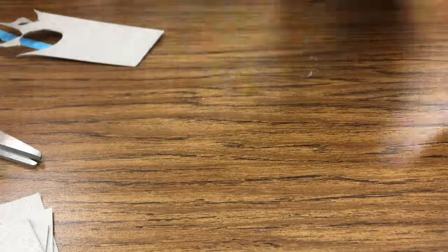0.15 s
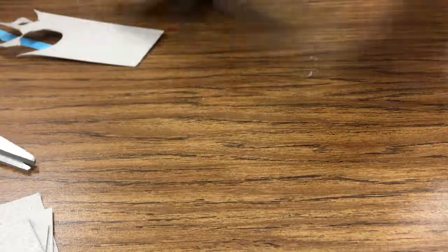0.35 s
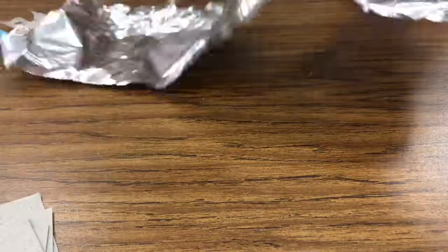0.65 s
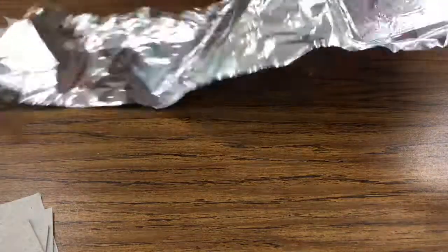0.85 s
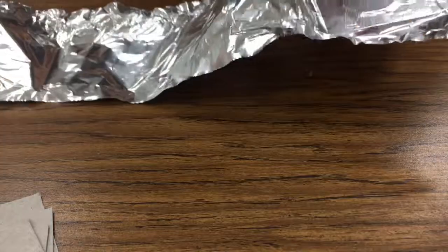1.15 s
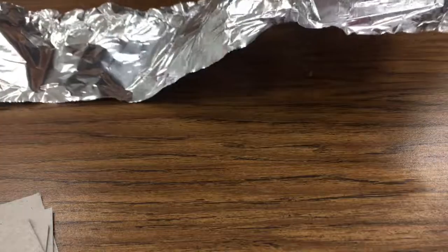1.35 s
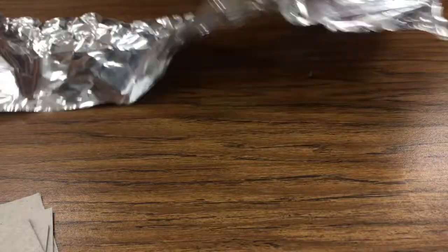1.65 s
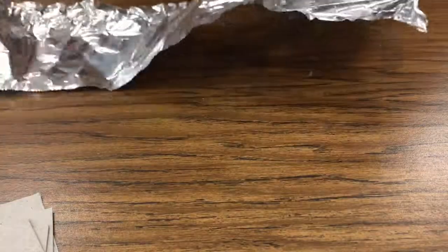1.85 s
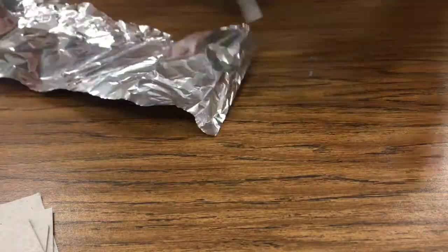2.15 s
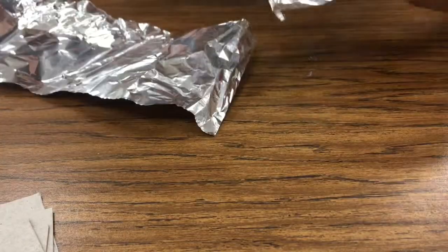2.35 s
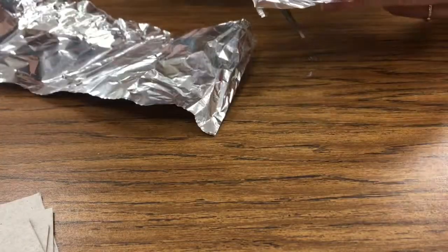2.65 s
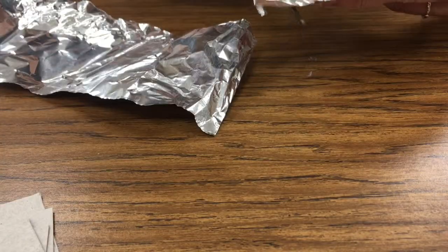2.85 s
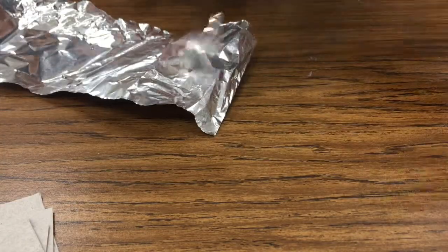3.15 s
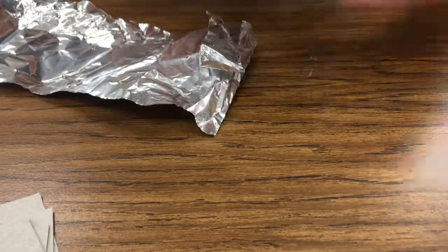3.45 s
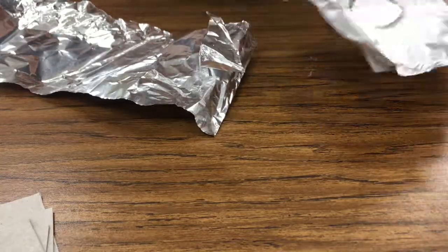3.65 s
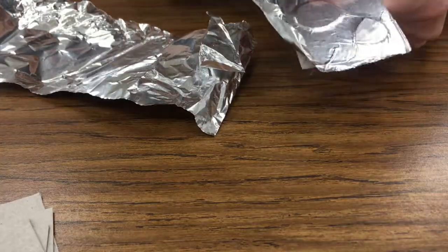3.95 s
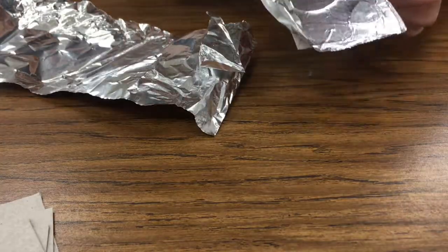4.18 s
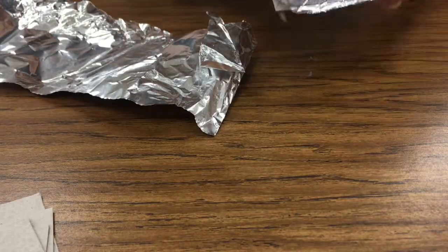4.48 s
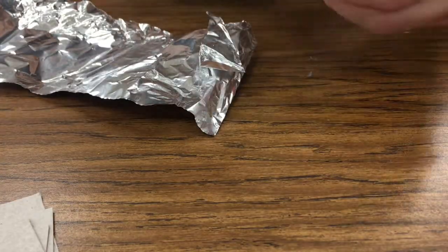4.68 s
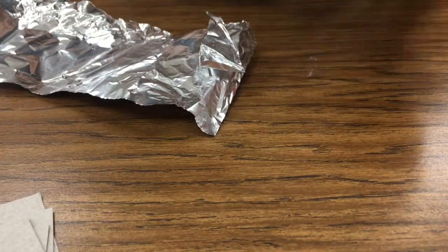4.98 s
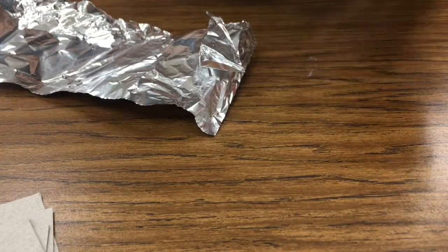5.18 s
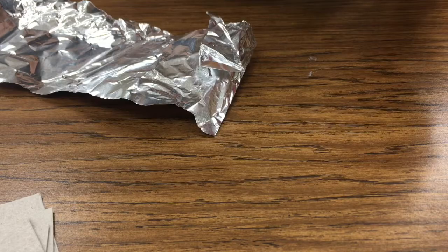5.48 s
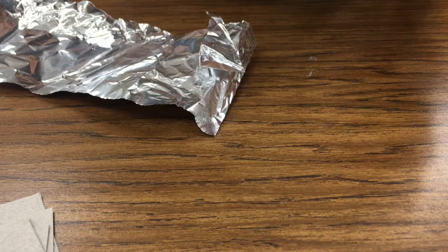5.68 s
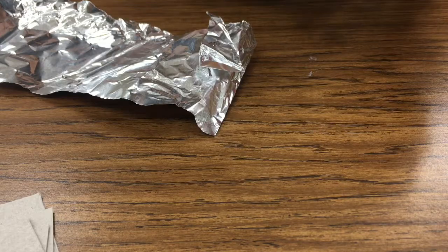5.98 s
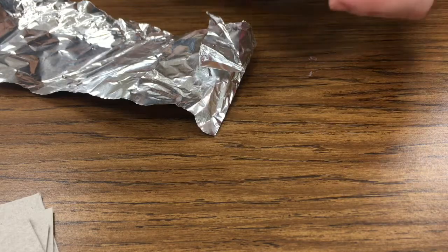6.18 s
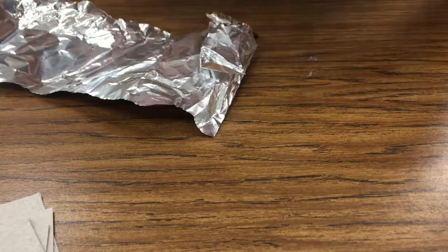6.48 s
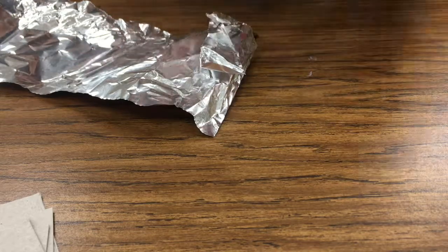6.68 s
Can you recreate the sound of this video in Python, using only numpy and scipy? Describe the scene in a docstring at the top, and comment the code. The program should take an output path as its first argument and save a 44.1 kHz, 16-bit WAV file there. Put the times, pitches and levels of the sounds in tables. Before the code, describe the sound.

A close, detailed view of foil handling in a quiet room with low, slowly beating fan hum, soft air rush and a thin hiss that dips briefly now and then. From 0 to 0.6 s, foil rustles densely and snaps brightly; a hard wooden double knock lands at about 0.25 s and a lighter one at 0.45 s. Strong crackles cluster at 0.75-0.95 s, the loose sheet ringing as a short metallic wash. After a calmer gap, crinkles resume at 1.5 s and run to about 2.4 s as it is laid down. Crisp snaps gather near 3 s, followed by faint squeaks and dull cardboard scuffs to 3.9 s. Dry, sharp ticks cluster at 4.05-4.3 s and around 5.05 s, with sparse light rubbing between. A bright snap at 5.98 s leads to small rustles and a faint squeak near 6.3 s, then near stillness with a few tiny ticks.

```python
"""A loose sheet of aluminium foil is lifted, with knocks on the wooden table at the start, and rings on as it moves.
It is laid on the table; then a small piece is pressed round cardboard and ticks drily, with squeaks and scuffs.
Snaps are bursts of tiny slips through a facet resonance; rustle is ticking noise that also lights up the sheet.
Knocks are noise cracks plus decaying table modes. Throughout, ventilation hums: steady sines in a low rush of
shaped noise. A thin hiss of brighter noise lies over everything and dips briefly now and then."""
import sys
import numpy as np
from scipy import signal
from scipy.fft import rfft, irfft, next_fast_len
from scipy.io import wavfile

SR = 44100
rng = np.random.default_rng(int(sys.argv[2]) if len(sys.argv) > 2 else 0)


def master(y):
    """Save y as 16-bit WAV."""
    cut = np.clip(np.atleast_2d(y).T, -1, 1)
    pcm = np.round(cut * 32767)  # scale
    wavfile.write(sys.argv[1], SR, pcm.astype(np.int16))


N = 300760

# The loudest creases buckling; snaps() trims the levels and scales the decay:
# start_s, level_db, decay_t60_s, facet_pitch_hz, body_db (low part against the bright part)
CREASES = [(.01, -36, .089, 13300, 1), (0.022, -34.5, 0.069, 12400, 3), (.0747, -27, 0.041, 8600, -6.5),
           (0.0894, -28, 0.13, 13100, -4.5), (0.147, -25.5, 0.044, 14100, -18),
           (.15, -23, 0.058, 11400, -8), (0.374, -29.5, 0.14, 13000, -27), (0.5294, -31, 0.066, 12100, -13),
           (.7253, -34.5, 0.075, 13800, -21), (0.7782, -32.5, 0.05, 8300, -13),
           (0.8323, -25, 0.049, 6400, -14.5), (.849, -26.5, 0.036, 8050, -31),
           (0.8622, -24, .07, 8360, -16.5), (.9213, -33.5, 0.032, 4650, -9),
           (0.9347, -25, 0.033, 6400, -29), (1.4966, -24.5, 0.015, 8460, -17.5),
           (1.5234, -32.5, 0.021, 8650, -15), (1.565, -37.5, 0.04, 8400, -3.5),
           (1.595, -30, .032, 10600, -28), (1.6905, -36, 0.18, 12400, -12.5),
           (1.8158, -38, .038, 10600, -11), (1.8243, -30.5, 0.046, 12400, -20),
           (1.8475, -33.5, .049, 13400, -13.5), (1.9118, -35, 0.091, 8700, -15.5),
           (1.9854, -32.5, 0.032, 8900, -18), (1.9936, -31.5, .026, 6700, -6.5),
           (2.0227, -27.5, .025, 9470, -18), (2.057, -34, 0.045, 11300, -23),
           (2.223, -38.5, 0.04, 6320, -28), (2.2629, -36, 0.012, 5440, -2),
           (2.2681, -28.5, 0.03, 14600, -15), (2.2925, -35, 0.043, 14900, -29),
           (2.3423, -30.5, 0.016, 13100, -15), (2.3696, -33, 0.021, 13600, -36),
           (2.492, -36.5, 0.01, 11100, -10.5), (2.619, -43, .041, 13200, -16),
           (2.6566, -34.5, 0.053, 11600, -21), (2.7166, -41.5, 0.05, 11700, -19),
           (2.8188, -43.5, .038, 9200, -15), (2.836, -47, 0.022, 10000, -23),
           (2.9389, -30.5, 0.022, 12500, -13), (2.9544, -31.5, .024, 8100, -15),
           (2.981, -32, 0.02, 13500, -19), (2.9952, -33, .027, 8850, -15), (3.0187, -25, 0.013, 13000, -16),
           (3.1523, -35, .04, 5000, -11), (3.163, -33.5, .05, 4530, -13), (3.3438, -40.5, 0.051, 13800, -4),
           (3.4137, -40, 0.093, 10400, -33), (3.4312, -31, 0.018, 9300, -27),
           (3.5558, -37, 0.022, 13000, -8), (4.0632, -28.5, .012, 9700, -28),
           (4.109, -25.5, 0.0088, 12700, -19), (4.1156, -35.5, 0.052, 4420, -19),
           (4.1423, -36.5, 0.026, 3650, -21), (4.153, -31.5, 0.028, 9400, -16),
           (4.2076, -28.5, 0.021, 8950, -19), (4.22, -22.5, .007, 8200, -36),
           (4.2863, -35.5, 0.024, 11600, -24), (4.3304, -43, 0.046, 12400, -15),
           (4.6011, -43, 0.018, 7860, -23), (4.7134, -41, 0.04, 8400, -14),
           (4.724, -36.5, .021, 12000, -22), (4.749, -38.5, .023, 4600, -22),
           (4.8104, -35, 0.075, 8300, -18), (5.0008, -36, 0.054, 12100, -12),
           (5.0408, -37.5, .019, 8400, -8), (5.0502, -32.5, 0.019, 14700, -18),
           (5.063, -33, 0.029, 12500, -14), (5.0792, -36.5, 0.035, 6500, -14),
           (5.1018, -27, 0.016, 9700, -5), (5.119, -33.5, 0.022, 8800, -3.5),
           (5.204, -41, 0.033, 6700, -24), (5.337, -31, 0.02, 14550, -6), (5.364, -42, 0.006, 15000, -21),
           (5.596, -33.5, .013, 6400, -6), (5.7094, -31, .028, 8700, 1), (5.8182, -34, 0.011, 8300, -23),
           (5.8381, -35.5, 0.084, 9000, -13), (5.866, -33, .016, 11200, -28),
           (5.9833, -23, 0.023, 12800, -4.5), (5.9984, -30, 0.0081, 12400, -22),
           (6.0945, -35, 0.0089, 12500, -23), (6.1, -35.5, 0.021, 9100, -27),
           (6.228, -38.5, 0.026, 10700, -6.5), (6.294, -34, 0.035, 5400, -31),
           (6.541, -40, 0.0083, 8750, -13), (6.766, -43, .031, 13900, -16)]
# How the foil is held: time_s, free_sheet_ringing_db, rustle_body_db
GRIP = [(0, -12, 9.5), (.9, 2, 8.5), (1.4, 5.5, 11), (2.0, 0, 4.5), (2.7, -2.5, -2), (3.0, -3, -28),
        (3.2, -16, -23), (3.6, -24, -4), (4.2, -23, -37), (4.8, -23, -18), (5.1, -24, -1), (6.1, -9, -10),
        (6.35, -10, -14)]
# Strokes of foil sliding under the fingers: start_s, length_s, push_level_db
SLIDE_STROKES = [(-.01, 0.031, -30.5), (0.071, 0.19, -40), (0.238, 0.095, -41.5), (0.356, 0.053, -40),
                 (0.422, 0.17, -44.5), (0.568, 0.048, -44), (0.634, 0.1, -49.5), (0.738, 0.063, -46),
                 (0.831, .1, -38), (0.938, 0.26, -48), (1.242, 0.11, -57), (1.415, 0.044, -54.5),
                 (1.469, .06, -49.5), (1.581, .035, -44.5), (1.686, 0.089, -41.5), (1.795, 0.11, -51.5),
                 (1.992, 0.084, -38.5), (2.095, 0.092, -43.5), (2.293, 0.075, -44), (2.9, 0.13, -52),
                 (3.014, 0.02, -41), (3.078, 0.16, -56), (3.149, 0.031, -36), (3.208, 0.035, -47),
                 (3.248, 0.021, -39.5), (3.558, 0.12, -54.5), (3.855, 0.038, -48.5), (4.103, 0.11, -48),
                 (4.332, 0.046, -38.5), (4.546, 0.15, -62), (4.731, 0.12, -51.5), (4.9, 0.075, -44.5),
                 (5.058, 0.095, -51), (5.82, 0.037, -46), (5.98, 0.047, -50), (6.13, 0.064, -60),
                 (6.19, 0.094, -50), (6.288, 0.081, -42.5), (6.417, 0.04, -49)]
# Every stroke starts to slide, slows as the hand runs out of travel, and comes to rest
STROKE_ATTACK_S, STROKE_SAG_DB, STROKE_RELEASE_T60_S = 0.0055, 7.5, 0.11
# Smooth hiss of sliding, against the ticks in the rustle
SLIDING_DB = -4
# Tone of the rustle: frequency_hz, relative_level_db
RUSTLE_SPECTRUM = [(200, -55), (500, 2), (900, -8.5), (1700, -7.5), (3000, -3), (4500, 1), (8000, 1.5),
                   (10000, 2), (13000, 4.5), (16000, -1.5)]
# Tone of the ringing sheet: frequency_hz, relative_level_db
RING_SPECTRUM = [(300, 34), (1000, 8.5), (2200, 20.5), (5000, 11.5), (9000, 3.5), (16000, -10)]
# Resonances of the crumpled sheet: frequency_hz, width_hz, boost_db
SHEET_RESONANCES = [(1110, 220, 4), (2170, 240, 7), (4400, 300, 4), (5740, 200, 2), (6480, 250, 4),
                    (8190, 350, 5), (12100, 700, 3)]
# Fingers shifting their grip: start_s, end_s, ticks_per_s, softest_tick_db
GRIP_SHIFTS = [(0, 0.602, 200, -55.5), (1.482, 2.379, 45, -61.5), (2.597, 2.931, 36, -66),
               (4.03, 4.662, 27, -62.5), (4.7, 5.021, 32, -65), (5.152, 5.52, 90, -67.5),
               (6.121, 6.402, 55, -62.5)]
# Stick and slip of a finger on the foil: start_s, length_s, pitch_hz, width_hz, level_db before the swell
FINGER_SQUEAKS = [(2.54, .11, 1310, 25, -63), (3.17, .11, 4520, 330, -51), (3.73, .16, 1310, 70, -68),
                  (4.809, .018, 8200, 120, -34), (6.29, .1, 4550, 330, -50.5), (6.405, .07, 4450, 300, -56)]
# Cardboard backing turned in the hand: start_s, length_s, centre_hz, level_db before swell and grain
CARD_SCUFFS = [(3.138, 0.073, 1090, -63), (3.499, 0.38, 650, -64.5), (4.7, 0.2, 1000, -67.5),
               (5.02, 0.11, 1050, -61.5), (6.19, .18, 1290, -69.5)]
# Knocks on the table: start_s, crack_db, crack_hz, crack_t60_s, upper_modes_db, thud_db
TABLE_KNOCKS = [(.008, -36.5, 1020, 0.19, -42, -54), (0.2508, -15.5, 4140, 0.024, -24, -32.5),
                (0.2723, -22.5, 1660, 0.066, -25.5, -27.5), (.2905, -42, 800, 0.042, -51, -53),
                (.385, -53, 690, .1, -59, -40.5), (0.45, -27, 3280, 0.027, -31.5, -35),
                (.462, -37, 615, 0.091, -56, -50), (0.496, -54, 900, .08, -59, -41)]
# Modes of the table top: frequency_hz, level_db against the blow, decay_t60_s
TABLE_MODES = [(179, -0.5, 0.11), (242, -5, 0.2), (357.3, -1, 0.14), (491, 2, 0.043), (586, -5.5, 0.086),
               (700, -37, 0.14), (1020, -0.5, 0.04), (1100, -1.5, 0.041), (1360, -4, 0.035),
               (1540, -12, 0.14), (1814, -5.5, 0.068), (2230, -4.5, 0.045), (3770, 4.5, 0.015)]
ROOM_T60_S = 0.36
# Fan motors: frequency_hz, level_db
FAN_HUM = [(100.5, -60), (117.75, -52), (118.36, -59.5), (240, -61), (355.3, -67.5)]
# Tone of the low rush of air: frequency_hz, relative_level_db
AIR_SPECTRUM = [(25, -102), (50, -23), (75, -15), (100, 0.5), (135, -0.5), (200, -4.5), (280, -12.5),
                (450, -9), (600, -16.5), (850, -25.5), (1250, -27.5), (1800, -41), (3000, -40.5),
                (16000, -43.5)]
# Tone of the thin hiss: frequency_hz, relative_level_db
HISS_SPECTRUM = [(600, 8), (1400, 6), (3000, 2.5), (6000, 3), (16000, 0)]
HISS_DB, HISS_DIP_EDGE_S = -62.5, 0.02
# The level of the thin hiss dips briefly: start_s, end_s, depth_db
HISS_LEVEL_DIPS = [(1.32, 1.446, 6), (2.545, 2.91, 32), (4.665, 4.72, 18), (5.22, 5.727, 7)]
CUTOFF_HZ = 16000


def from_db(db):
    """Turn decibels into gain."""
    return 10 ** (np.asarray(db) / 20)


def rms_one(x):
    """Scale a sound to an RMS of 1."""
    return x / np.sqrt(np.mean(x ** 2) + 1e-20)


def energy_one(x):
    """Scale a sound to a total energy of 1."""
    return x / np.sqrt(np.sum(x ** 2) + 1e-20)


def in_time(rows):
    """Draw each column of a curve out to every sample."""
    s, *columns = np.transpose(rows)
    return [np.interp(np.arange(N) / SR, s, column) for column in columns]


def add(track, start_s, sound):
    """Mix a sound in at its start time."""
    at = max(0, round(start_s * SR))
    track[at:at + len(sound)] += sound[:N - at]


def band(x, low_hz, high_hz):
    """Keep the band between two frequencies."""
    edges_hz = [low_hz, min(high_hz, 0.45 * SR)]
    return signal.sosfilt(signal.butter(2, edges_hz, "band", fs=SR, output="sos"), x)


def resonate(x, hz, width_hz):
    """Ring one resonance with gain 1 on top."""
    r = np.exp(-np.pi * width_hz / SR)
    feed = np.array([1, 0, -1]) * (1 - r * r) / 2
    feedback = [1, -2 * r * np.cos(2 * np.pi * hz / SR), r * r]
    return signal.lfilter(feed, feedback, x + 1e-18)


def colour(x, spectrum):
    """Give a sound a smooth spectrum, drawn over log frequency."""
    size = next_fast_len(len(x))
    hz, db = np.transpose(spectrum)
    grid_hz = np.arange(size // 2 + 1) * SR / size
    gain = from_db(np.interp(np.log(grid_hz + 1), np.log(hz), db))
    return irfft(rfft(x, size) * gain, size)[:len(x)]


def drift(rate_hz):
    """Wander slowly at random with an RMS of 1."""
    step = 40   # samples between drawn points
    r = np.exp(-2 * np.pi * step * rate_hz / SR)
    slow = signal.lfilter([1], [1, -2 * r, r * r], rng.standard_normal(N // step + 2002))
    slow = slow[2000:]   # let the filter settle first
    return np.interp(np.arange(N) / step, np.arange(len(slow)), rms_one(slow))


def decay(t, t60):
    """Fall by 60 dB over t60 seconds."""
    return np.exp(-np.log(1000) * t / t60)


def tail(t60):
    """Half a second of noise that dies away."""
    t = np.arange(SR // 2) / SR
    return rng.standard_normal(len(t)) * decay(t, t60)


def snaps(level_db, body_db, facet_db, facet_width_hz, uneven_db, stretch, edge_hz, first_db):
    """A crease gives way with a jerk and an avalanche of tiny slips, which ring its facet and shake the backing."""
    out, t = np.zeros(N), np.arange(SR // 8) / SR
    for s, db, t60, hz, low_db in CREASES:
        jolts = np.interp(t, t[::24], rng.standard_normal(len(t[::24])))
        slips = rng.standard_normal(len(t)) * from_db(uneven_db * jolts) * decay(t, t60 * stretch)
        slips[0] += from_db(first_db)   # the jerk
        bright = band(slips, edge_hz, 16400) + from_db(facet_db) * resonate(slips, hz, facet_width_hz)
        # the backing has a resonance of its own
        body = band(slips, 760, 2380) + from_db(-11) * resonate(slips, 1174, 180)
        # a longer avalanche carries more energy
        size = from_db(db + level_db) * np.sqrt(t60 * SR / np.log(1e6))
        add(out, s, size * (energy_one(bright) - from_db(low_db + body_db) * energy_one(body)))
    return out


def stray_ticks(spread_db, t60, facet_db):
    """Under a shifting grip small wrinkles flip at random, each with a pitch of its own."""
    out = np.zeros(N)
    for start, end, per_s, db in GRIP_SHIFTS:
        for when, pitch, size in rng.random((int(per_s * (end - start)), 3)):
            slips = tail(t60)[:SR // 50]
            facet = resonate(slips, 3000 + 10000 * pitch, 600)
            tick = band(slips, 2000, 17000) + from_db(facet_db) * facet
            # squaring the size makes loud ticks rare
            add(out, start + when * (end - start), from_db(db + spread_db * size ** 2) * rms_one(tick))
    return out


def sheet_colour(x):
    """The sheet's resonances lift their bands one after another."""
    for hz, width_hz, db in SHEET_RESONANCES:
        x = x + (from_db(db) - 1) * resonate(x, hz, width_hz)
    return x


def sheet_ring(x, t60):
    """The free sheet has so many modes that it rings as a short metallic wash."""
    wash = energy_one(sheet_colour(colour(tail(t60), RING_SPECTRUM)))
    return signal.fftconvolve(x, wash)[:N]


def sliding():
    """Each stroke rises quickly, sags while it lasts and dies away; overlapping strokes add in power."""
    power = np.zeros(N)
    for s, length, db in SLIDE_STROKES:
        t = np.arange(int((length + 2 * STROKE_RELEASE_T60_S) * SR)) / SR
        attack = np.minimum(t / STROKE_ATTACK_S, 1)
        sag_db = STROKE_SAG_DB * np.minimum(t / length, 1)
        release = decay(np.maximum(t - length, 0), STROKE_RELEASE_T60_S)
        add(power, s, (from_db(db - sag_db) * attack * release) ** 2)
    return np.sqrt(power)


def rustle(body_db, per_s, smooth_db, clump_db):
    """Countless tiny wrinkles tick in clumps, each on a facet of its own, over the hiss of sliding."""
    born = rng.random(N) < per_s * from_db(clump_db * drift(40)) / SR
    ticks = born * rng.choice([-1, 1], N)
    facets_hz = np.linspace(1200, 15500, 18)
    dealt = rng.integers(0, len(facets_hz), N)   # which facet each tick strikes
    grains = sum(resonate(ticks * (dealt == k), hz, 2250) for k, hz in enumerate(facets_hz))
    foil = rms_one(grains) + rms_one(ticks) + from_db(smooth_db) * rng.standard_normal(N)
    foil = rms_one(sheet_colour(colour(foil, RUSTLE_SPECTRUM)))
    low = signal.sosfilt(signal.butter(1, 2500, fs=SR, output="sos"), foil)
    return sliding() * (foil + (from_db(body_db) - 1) * low)


def flexing(x, patch_db, patch_s, patch_hz):
    """As the foil bends its facets change shape, so resonances come and go all over the spectrum."""
    size = 256   # window in samples, hopping by half
    _, _, frames = signal.stft(x, nperseg=size)
    field = rng.standard_normal(frames.shape)
    # smooth the random gains along time, then along frequency
    time_pole = np.exp(-size / 2 / SR / patch_s)
    pitch_pole = np.exp(-SR / size / patch_hz)
    field = signal.filtfilt([1], [1, -time_pole], field, axis=1, padtype="even")
    field = signal.filtfilt([1], [1, -pitch_pole], field, axis=0, padtype="even")
    gain = rms_one(from_db(patch_db * np.tanh(rms_one(field) / 2) * 2))
    return signal.istft(frames * gain, nperseg=size)[1][:N]


def squeaks():
    """A finger that sticks and slips keeps one resonance singing for a moment."""
    out = np.zeros(N)
    for s, length, hz, width_hz, db in FINGER_SQUEAKS:
        count = int(length * SR)
        song = rms_one(resonate(rng.standard_normal(count), hz, width_hz))
        add(out, s, from_db(db) * np.sqrt(np.hanning(count)) * song)
    return out


def scuffs(grain_db, width_share):
    """Cardboard dragging under the fingers gives a dull, grainy swell."""
    out = np.zeros(N)
    for s, length, hz, db in CARD_SCUFFS:
        count = int(length * SR)
        drag = band(rng.standard_normal(count), hz / (1 + width_share), hz * (1 + width_share))
        add(out, s, from_db(db) * np.sqrt(np.hanning(count)) * rms_one(drag))
    return out * from_db(grain_db * drift(60))


def knocks(thud_top_hz, boom_db, boom_t60):
    """Each contact cracks and rings the table top; a heavy one brings out the low modes and a dull boom."""
    out, t = np.zeros(N), np.arange(SR // 2) / SR
    for s, crack_db, crack_hz, crack_t60, upper_db, thud_db in TABLE_KNOCKS:
        crack = energy_one(band(tail(crack_t60), crack_hz * 0.69, crack_hz * 1.4))
        boom = rms_one(band(tail(boom_t60), 150, 960))
        # a longer crack carries more energy
        sound = from_db(crack_db) * np.sqrt(crack_t60 * SR / np.log(1e6)) * crack
        sound = sound + from_db(thud_db + boom_db) * boom
        for k, (hz, db, t60) in enumerate(TABLE_MODES):
            blow_db = thud_db if hz < thud_top_hz else upper_db
            mode = (-1) ** k * np.sin(2 * np.pi * hz * t) * decay(t, t60)   # polarity alternates
            sound = sound + from_db(db + blow_db) * mode
        add(out, s, sound)
    return out


def room(x, wet_db, dull_hz):
    """A faint, dull room tail follows the direct sound after 5 ms."""
    echo = energy_one(band(tail(ROOM_T60_S), 120, dull_hz))
    echo = np.pad(echo, (SR // 200, 0))
    return x + from_db(wet_db) * signal.fftconvolve(x, echo)[:N]


def ventilation(air_db, swell_s):
    """Fan motors at slightly different speeds beat slowly in a low rush of air."""
    t = np.arange(N) / SR - swell_s   # all motors are in phase at swell_s
    hum = sum(from_db(db) * np.sqrt(2) * np.cos(2 * np.pi * hz * t) for hz, db in FAN_HUM)
    air = from_db(air_db) * rms_one(colour(rng.standard_normal(N), AIR_SPECTRUM))
    return hum + air


def thin_hiss():
    """Steady shaped noise whose level dips briefly, with short ramps in and out."""
    t, level_db = np.arange(N) / SR, HISS_DB
    for start, end, depth_db in HISS_LEVEL_DIPS:
        dip = np.clip(np.minimum(t - start, end - t) / HISS_DIP_EDGE_S, 0, 1)
        level_db = level_db - depth_db * dip
    return from_db(level_db) * rms_one(colour(rng.standard_normal(N), HISS_SPECTRUM))


def scene():
    """Foil and knocks close by, ventilation behind, a thin hiss over all."""
    free_db, body_db = in_time(GRIP)
    creases = snaps(level_db=-2.0, body_db=-6.0, facet_db=10.0, facet_width_hz=587,
                    uneven_db=1.5, stretch=0.83, edge_hz=5240, first_db=5.5)
    creases = creases + stray_ticks(spread_db=6, t60=0.022, facet_db=16)
    wash = sheet_ring(creases * from_db(free_db), t60=0.071)
    wash = wash + rustle(body_db, per_s=2500, smooth_db=SLIDING_DB, clump_db=6)
    moving = flexing(wash, patch_db=4.5, patch_s=0.0077, patch_hz=150)
    foil = creases + squeaks() + scuffs(grain_db=3.0, width_share=0.18) + moving
    blows = knocks(thud_top_hz=800, boom_db=-23.0, boom_t60=0.32)
    blows = band(blows, 95, 16000)   # a table top radiates little deep bass
    close = room(foil + blows, wet_db=-23.5, dull_hz=6000)
    return (close + ventilation(air_db=-53.5, swell_s=1.2) + thin_hiss())[None]


def record(dry):
    """Cut the top steeply above CUTOFF_HZ."""
    return signal.sosfilt(signal.ellip(10, 0.2, 70, CUTOFF_HZ, fs=SR, output="sos"), dry)


dry = scene()
out = record(dry)
master(out)
```